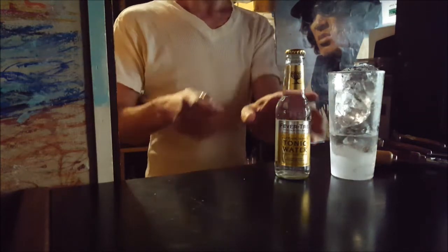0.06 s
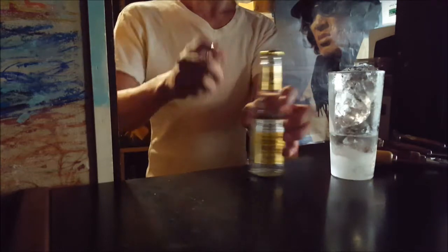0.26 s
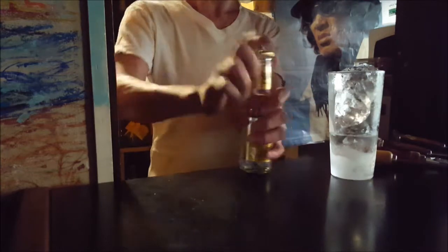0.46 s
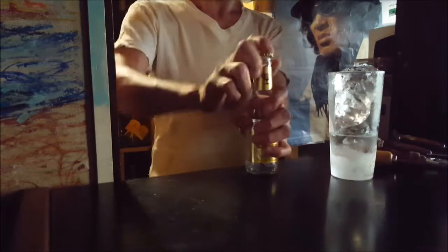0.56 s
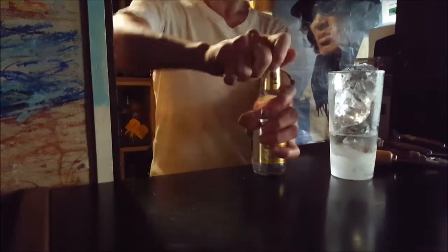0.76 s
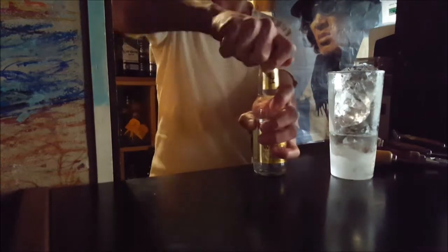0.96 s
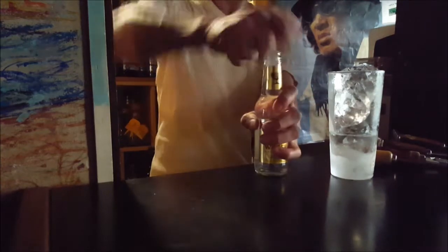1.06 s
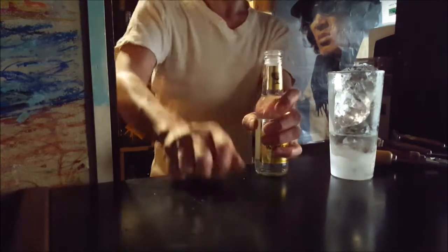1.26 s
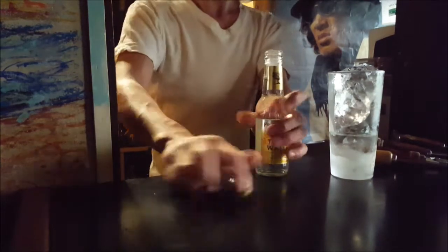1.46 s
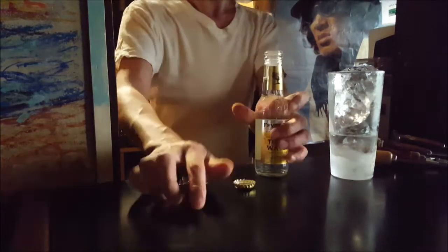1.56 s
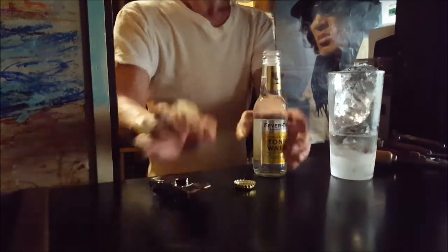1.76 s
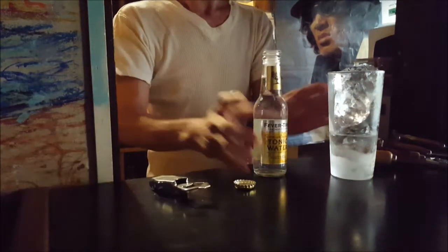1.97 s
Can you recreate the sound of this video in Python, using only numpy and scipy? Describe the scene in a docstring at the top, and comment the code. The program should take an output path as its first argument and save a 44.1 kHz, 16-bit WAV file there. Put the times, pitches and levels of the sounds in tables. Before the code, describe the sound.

Bottle cap pried off with a short hiss and pop, metal rattling onto a wooden counter.

```python
"""A glass bottle is opened on a wooden bar counter: it slides and knocks on the wood while a metal
opener hooks under the cap, clinking and grinding. Gas hisses out and the cap pops off, drops on the
counter, pings and rattles; the opener is put down with a clatter. Each blow rings the modes of
glass, wood or metal, and a small, fairly live room answers it over faint air and an appliance hum."""
import sys
import numpy as np
from scipy import signal
from scipy.io import wavfile

SR = 44100
rng = np.random.default_rng(int(sys.argv[2]) if len(sys.argv) > 2 else 0)


def pcm_store(signal):
    """Save signal as 16-bit PCM."""
    levels = np.round(np.clip(np.atleast_2d(signal), -1, 1) * 32767)
    wavfile.write(sys.argv[1], SR, levels.astype(np.int16).T)


N = 88200
T = np.arange(N) / SR

# modes of the bottle standing on the counter: (frequency [Hz], relative level [dB])
BOTTLE_MODES = [(203, -15), (241, -4), (421, -7), (487, -3), (523, -5), (557, -28), (653, -10), (851, -3.5),
                (888, -4), (965, -4), (1141, -11.5), (1680, 2)]


def bottle():
    """The held bottle scrapes over the counter, judders on its base and knocks on the wood."""
    # swell of the slide: (time [s], level [dB])
    slide_swell = [(.108, -64.5), (.122, -44), (.17, -43.5), (.22, -39.5), (.30, -41.5), (.36, -50),
                   (.43, -61), (.5, -75)]
    # spectrum of glass rubbing on wood: (frequency [Hz], relative level [dB])
    slide_colour = [(88, -20.5), (150, -35), (337, -4.5), (371, -1), (772, -24.5), (936, -14), (1050, -16),
                    (2550, -14.5), (15000, -44)]
    # the base judders as it is set down: (time [s], level [dB])
    judder_swell = [(.23, -51), (.25, -16.5), (.285, -47), (.31, -40), (.35, -61), (.39, -66)]
    # glass knocks on wood: (time [s], thud [dB], clack [dB], tick [dB])
    knocks = [(.186, -36.5, -72, -46), (.239, -19.5, -34, -43), (.268, -24, -45, -76),
              (.320, -22, -40.5, -63.5), (.343, -27, -47, -47.5), (.416, -27, -45.5, -77.5),
              (.425, -27, -43.5, -57.5), (.659, -21.5, -35.5, -50), (1.020, -30.5, -46, -55),
              (1.302, -40.5, -64, -60.5), (1.336, -42.5, -50.5, -55.5)]
    judder_hz = (235.4, 262.6)
    slide = from_db(np.interp(T, *np.transpose(slide_swell))) * noise(slide_colour)
    rub = rng.standard_normal(N)
    judder = band(rub * envelope(judder_swell), judder_hz) / band(rub, judder_hz).std()
    blows = struck(knocks, thud_hz=(185, 470), top_hz=8000, modes=BOTTLE_MODES,
                   crack_db=-22, modes_db=-39.5, body_db=-35.5, room_db=-31, pan_db=-2)
    return pan(slide + judder, -2.5) + blows


def metal_taps():
    """The opener catches on cap and neck, jolting the bottle; later the loose cap gives one faint tick."""
    # metal contacts: (time [s], thud [dB], clack [dB], tick [dB])
    taps = [(.4575, -21.5, -36.5, -31.5), (.465, -26.5, -40.5, -45), (.471, -24, -36, -36.5),
            (.493, -23.5, -29, -29.5), (.509, -37, -50, -54), (.554, -23, -36.5, -31.5),
            (.675, -59.5, -37, -54), (.687, -62, -44, -47.5), (.743, -64.5, -51, -57.5),
            (1.227, -88, -56.5, -47.5)]
    return struck(taps, thud_hz=(250, 620), top_hz=11500, modes=BOTTLE_MODES,
                  crack_db=-25.5, modes_db=-34.5, body_db=-30, room_db=-31, pan_db=-2)


def metal_clinks():
    """The opener clinks on the cap, then the loose cap ticks and pings, then the opener lands."""
    # clinks, pitched by grip and contact: (time [s], frequency [Hz], level [dB], t60 [s])
    clinks = [(.4575, 4200, -17.5, 0.032), (.493, 8350, -41, 0.085), (.675, 2574, -38, 0.18),
              (.687, 2340, -38.5, 0.1), (1.227, 2450, -43.5, 0.057), (1.448, 14800, -35, 0.12),
              (1.558, 3880, -25, 0.1), (1.558, 4310, -26.5, 0.035), (1.613, 1390, -34, 0.12),
              (1.704, 4100, -32.5, 0.036)]
    return pings(clinks)


def grind():
    """Steel grinds over the crimped rim: uneven tiny slips, each ringing the metal differently."""
    # strength of the slips: (time [s], relative level [dB])
    swell = [(.456, -38.5), (.472, -41), (.488, -41), (.498, -36.5), (.52, -47), (.55, -60)]
    # resonances of the metal: (frequency [Hz], relative level [dB])
    modes = [(2100, 1.5), (4100, 0.5), (5560, -4.5), (8350, 3), (9000, -2), (9690, -11.5), (11380, -9)]
    slips_per_s, width_hz = 850, 180
    slips = (rng.random(N) < slips_per_s / SR) * envelope(swell)
    slips = slips * SR / np.sqrt(2 * slips_per_s * width_hz)
    out = 0
    for hz, db in modes:
        drive = slips * rng.standard_normal((2, N))
        out = out + from_db(db) * band(drive, (hz - width_hz / 2, hz + width_hz / 2), order=1)
    return out


def gas():
    """Gas spurts out thin and bright, fills out downward as the gap widens, whistles and is spent."""
    # spectrum of the hiss: (frequency [Hz], relative level [dB])
    colour = [(120, -45.5), (200, -8), (696, -0.5), (986, -3), (1350, -9.5), (1900, 1.5), (2690, -1.5),
              (3800, -2.5), (5400, -2), (8580, 0), (16000, -3)]
    # lower bands start later: (frequency [Hz], delay [s])
    lags = [(1700, 0.013), (5000, 0.00058)]
    # whistles in the crimps: (frequency [Hz], level against the hiss [dB])
    whistles = [(4940, -16.5), (8350, -11.5), (11590, -17), (12050, -12), (13160, -11)]
    start_s, rise_s, hold_s = 0.8193, 0.029, 0.014
    hiss_db, fall_db_per_s, half_width_hz = -22.5, 469, 30
    age = T - start_s
    bands = [(at_hz(lags, hz), from_db(at_hz(colour, hz)) * hiss) for hz, hiss in noise_bands()]
    out = sum(np.clip((age - lag) / rise_s, 0, 1) ** 0.97 * hiss for lag, hiss in bands)
    out = out / sum(hiss for _, hiss in bands).std()
    for hz, db in whistles:
        tone = band(rng.standard_normal((2, N)), (hz - half_width_hz, hz + half_width_hz))
        out = out + from_db(db) * np.clip(age / rise_s, 0, 1) * tone / tone.std()
    return out * from_db(hiss_db - fall_db_per_s * np.maximum(age - rise_s - hold_s, 0))


def pop():
    """The cap lets go, the neck rings and the pull shakes the whole counter."""
    # snaps of the release: (time [s], thud [dB], clack [dB], tick [dB])
    snaps = [(.903, -49, -35, -25.5), (.906, -21, -24.5, -45), (.910, -20, -33, -46),
             (.916, -29.5, -29.5, -41), (.923, -31, -32.5, -48)]
    # modes of the neck: (frequency [Hz], relative level [dB])
    neck_modes = [(203, -9.5), (241, -5), (440, -7), (558, -1), (650, -17), (705, -7.5), (835, 8.5),
                  (955, 4), (1144, 0.5), (1507, 2.5), (1655, 6)]
    shake_hz, shake_t60_s = (44, 129), 0.34
    age = T - snaps[0][0]
    fade = (age > 0) * from_db(-22 - 60 * np.abs(age) / shake_t60_s)
    shake = band(rng.standard_normal(N) * fade, shake_hz)
    return shake + struck(snaps, thud_hz=(180, 580), top_hz=11000, modes=neck_modes,
                          crack_db=-17.5, modes_db=-43, body_db=-29.5, room_db=-29.5, pan_db=-0.9)


def cap_drop(counter_modes):
    """The cap bounces with a ping and shivers in a dying run of tiny touches."""
    # bounces on the counter: (time [s], thud [dB], clack [dB], tick [dB], own ring [dB])
    bounces = [(1.3745, -35, -31, -50, -23), (1.406, -38, -48, -44.5, -41),
               (1.4480, -43.5, -33.5, -25, -29.5), (1.464, -57, -41.5, -36.5, -47),
               (1.515, -47, -49, -47, -38), (1.547, -68, -43.5, -46, -48)]
    # the cap's own ring: (frequency [Hz], relative level [dB], t60 [s])
    cap_modes = [(3490, 0.5, 0.11), (3560, -9.5, 0.06), (4430, -19, 0.18), (7540, -17, .14),
                 (8800, -23.5, .15), (11400, -33, .2), (11710, -26, .17), (13380, -27, .16),
                 (14950, -29, .17)]
    rattle_start_s, touches_per_s, fall_db_per_s, rattle_hz = 1.451, 760, 142, (1880, 8700)
    age = T - rattle_start_s
    touches = (rng.random(N) < touches_per_s / SR) * rng.standard_normal(N) * (age > 0)
    rattle = band(touches * from_db(-11.5 - fall_db_per_s * np.abs(age)), rattle_hz)
    ring = pings([(s, hz, ring_db + db, t60) for s, *_, ring_db in bounces for hz, db, t60 in cap_modes])
    return ring + struck(bounces, thud_hz=(240, 640), top_hz=10800, modes=counter_modes, crack_db=-21,
                         modes_db=-43, body_db=-26, room_db=-30.5, pan_db=-1.5, extra_forces=[rattle])


def opener_clatter(counter_modes):
    """The opener lands end by end and rocks to rest."""
    # metal lands on wood: (time [s], thud [dB], clack [dB], tick [dB])
    landings = [(1.558, -39, -31.5, -32.5), (1.568, -28.5, -46, -54), (1.576, -36, -27.5, -33),
                (1.586, -49, -33, -49), (1.598, -29.5, -36, -33), (1.613, -48, -26, -36),
                (1.621, -53, -34, -39), (1.630, -39.5, -28, -70), (1.704, -34.5, -28, -39.5),
                (1.781, -37.5, -34, -52.5), (1.799, -41, -39, -51)]
    return struck(landings, thud_hz=(240, 660), top_hz=8070, modes=counter_modes,
                  crack_db=-24, modes_db=-38, body_db=-26.5, room_db=-32, pan_db=-1.5)


def pings(rows):
    """Thin metal rings as dying sines; reflections make them waver, differently on each side."""
    depth, wavers_per_s, build_s = 2, 210, 0.019
    out, age = np.zeros((2, N + SR)), T[:SR // 2]
    steady = np.exp(1j * np.array([[0], [np.pi / 3]]))
    for s, hz, db, t60 in rows:
        start = int(s * SR)
        knots = (rng.standard_normal((2, 400)) + 1j * rng.standard_normal((2, 400))) / np.sqrt(2)
        waver = np.array([np.interp(age * wavers_per_s, np.arange(len(side)), side) for side in knots])
        amplitude = steady + depth * waver * (1 - np.exp(-age / build_s))
        tone = np.imag(amplitude * np.exp(2j * np.pi * hz * age))
        out[:, start:start + len(age)] += from_db(db - 60 * age / t60) * tone
    return out[:, :N]


def contact(blow, thud_hz, top_hz):
    """A short push made of a thud, a clack and a tick, each at its own level."""
    s, *levels = blow
    clack_hz, tick_hz, boost_db = (684, 2043), (2780, top_hz), 22.5
    force = 0
    for polarity, db, (low, high) in zip((1, -1, 1), levels, (thud_hz, clack_hz, tick_hz)):
        click = np.zeros(N)
        click[int(s * SR)] = from_db(db + boost_db)
        force = force + polarity * band(click, (low, high)) * np.sqrt(SR / 2 / (high - low))
    return force


def modal_ring(modes, age):
    """Higher modes die sooner; each blow meets them, and reaches each side, a little differently."""
    strike_spread_db, path_spread_s = 1, 0.00027
    out = 0
    for hz, db in modes:
        t60 = 0.2 * (hz / 500) ** -0.35
        fade = from_db(db + rng.normal(0, strike_spread_db) - 60 * age / t60)
        out = out + fade * np.cos(2 * np.pi * hz * (age + rng.normal(0, path_spread_s, (2, 1))))
    return out


def struck(blows, thud_hz, top_hz, modes, crack_db, modes_db, body_db, room_db, pan_db, extra_forces=()):
    """A blow is heard as its crack, the object's modes, a brief dense ring and the room's tail."""
    # dense ring of wood and room: (frequency [Hz], relative level [dB])
    ring_colour = [(60, 0.5), (150, -13.5), (235, 0), (330, -20), (470, -2.5), (1000, 0.5), (2000, 1),
                   (4000, 2), (8000, -1.5), (15000, -2)]
    # decay of the room: (frequency [Hz], t60 [s])
    room_t60 = [(100, 0.82), (250, 0.3), (500, 0.28), (1500, 0.26), (4000, 0.19), (8000, 0.21),
                (15000, 0.046)]
    crack_t60_s, body_t60_s, room_build_s, direct_db = 0.0073, 0.089, 0.0097, -15.5
    age, wood, room = T[:SR // 2], 0, 0
    for hz, ring in noise_bands():
        ring = ring * from_db(at_hz(ring_colour, hz))
        wood = wood + ring
        room = room + ring[:, -len(age):] * from_db(-60 * age / at_hz(room_t60, hz))
    room = from_db(room_db) * room * (1 - np.exp(-age / room_build_s))
    fade = from_db(crack_db - 60 * age / crack_t60_s) + from_db(body_db - 60 * age / body_t60_s)
    forces = [contact(blow, thud_hz, top_hz) for blow in blows] + list(extra_forces)
    out = 0
    for force in forces:
        body = np.roll(wood, rng.integers(N), axis=1)[:, :len(age)] * fade
        response = from_db(modes_db) * modal_ring(modes, age) + body + room
        out = out + from_db(direct_db) * force + signal.fftconvolve(force[None], response, axes=1)[:, :N]
    return pan(out, pan_db)


def room_tone():
    """The quiet air of the bar and the hum of an appliance."""
    # spectrum of the air: (frequency [Hz], relative level [dB])
    air_colour = [(25, -7.5), (70, -13), (130, -15), (400, -17.5), (1600, -28.5), (4000, -41.5),
                  (9000, -41.5), (15000, -49.5)]
    air_db, hum_hz, hum_db = -61, 145.6, -64
    return from_db(air_db) * noise(air_colour) + from_db(hum_db) * np.sin(2 * np.pi * hum_hz * T)


def noise_bands():
    """Yield (centre [Hz], stereo noise) by half octaves, alike in the bass and unrelated in the treble."""
    # likeness of left and right: (frequency [Hz], correlation)
    likeness = [(60, 0.73), (160, 0.88), (300, 1), (600, 0.8), (1200, -0.035), (4000, 0.13), (14000, 0.018)]
    edges = 25 * 2 ** np.arange(0, 9.6, .5)
    for low, high in zip(edges, edges[1:]):
        hz = np.sqrt(low * high)
        mid, side = band(rng.standard_normal((2, N + SR // 4)), (low, high))[:, -N:]
        alike = np.clip(at_hz(likeness, hz), -1, 1)
        yield hz, np.sqrt(1 + alike) * mid + np.sqrt(1 - alike) * side * [[1], [-1]]


def noise(colour):
    """Stereo noise of a given colour, rms 1."""
    x = sum(from_db(at_hz(colour, hz)) * part for hz, part in noise_bands())
    return x / x.std()


def band(x, edges_hz, order=2):
    """Butterworth band-pass."""
    sos = signal.butter(order, np.clip(edges_hz, 10, .45 * SR), "band", fs=SR, output="sos")
    return signal.sosfilt(sos, x + 1e-18)


def envelope(points):
    """Gain through (time [s], level [dB]) points, silent outside them."""
    return from_db(np.interp(T, *np.transpose(points), left=-np.inf, right=-np.inf))


def at_hz(points, hz):
    """Read a table on a log-frequency axis."""
    freqs, values = np.transpose(points)
    return np.interp(np.log(hz), np.log(freqs), values)


def pan(x, left_over_right_db):
    """Tilt the level between the sides."""
    return x * from_db(left_over_right_db * np.array([[.5], [-.5]]))


def from_db(db):
    """Decibels to gain."""
    return 10 ** (np.asarray(db) / 20)


def scene():
    """The bottle is opened, then cap and opener land on the same counter, over the room tone."""
    # modes of the wooden counter: (frequency [Hz], relative level [dB])
    counter_modes = [(240, -8), (428, -6), (494, -1.5), (647, -7), (799, -16), (1045, -1.5), (1545, -5),
                     (1687, -1.5), (1840, -1)]
    return (bottle() + metal_clinks() + grind() + metal_taps() + gas() + pop()
            + cap_drop(counter_modes) + opener_clatter(counter_modes) + room_tone())


def record(dry):
    """Peaks are rounded and the top is cut steeply."""
    ceiling, cutoff_hz = .55, 15800
    rounded = ceiling * np.tanh(dry / ceiling)
    return signal.sosfilt(signal.ellip(10, .2, 80, cutoff_hz, fs=SR, output="sos"), rounded)


dry = scene()
out = record(dry)
pcm_store(out)
```